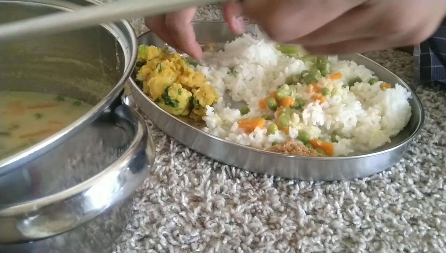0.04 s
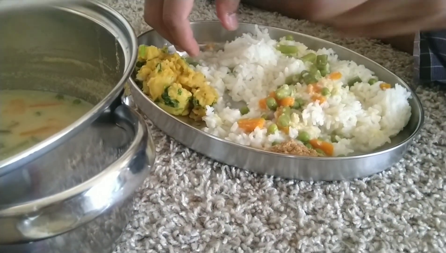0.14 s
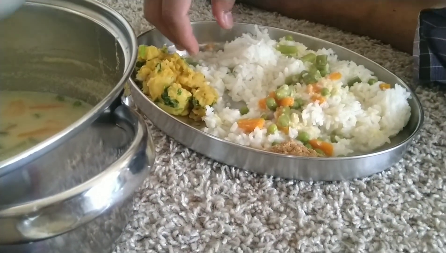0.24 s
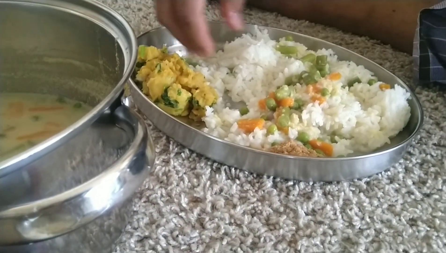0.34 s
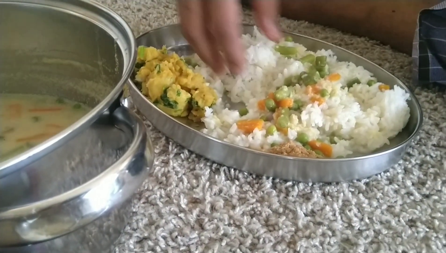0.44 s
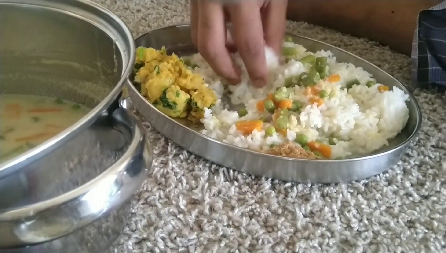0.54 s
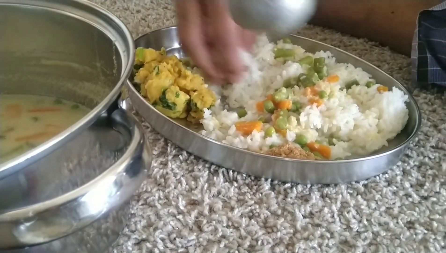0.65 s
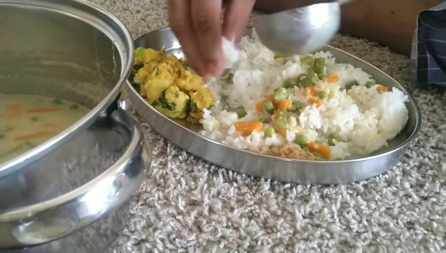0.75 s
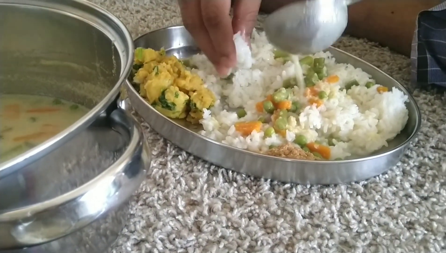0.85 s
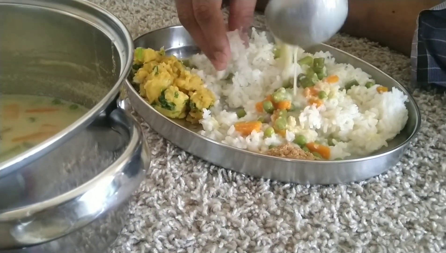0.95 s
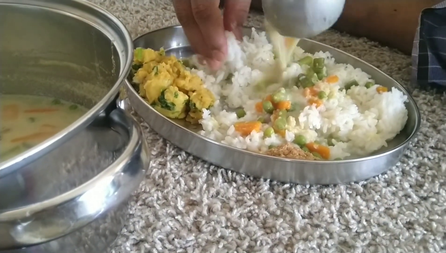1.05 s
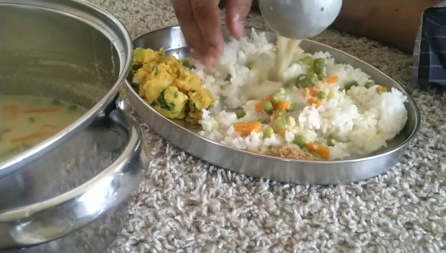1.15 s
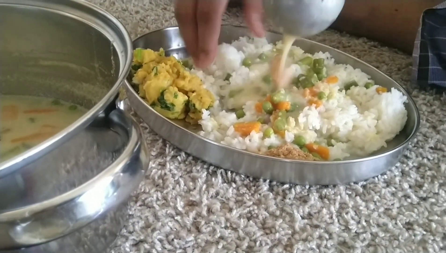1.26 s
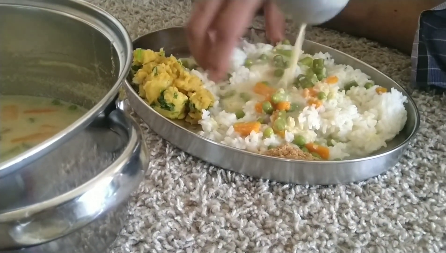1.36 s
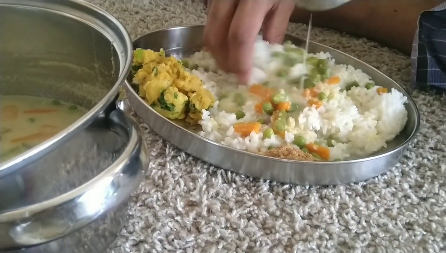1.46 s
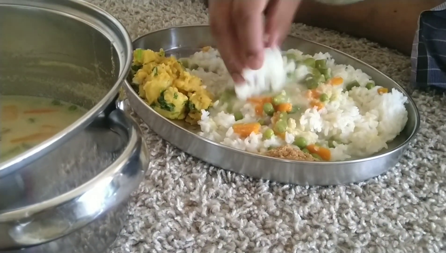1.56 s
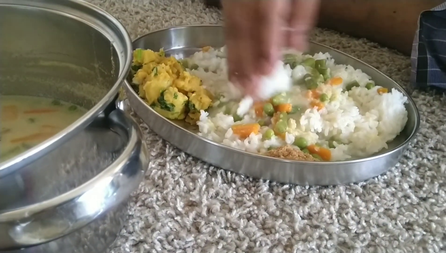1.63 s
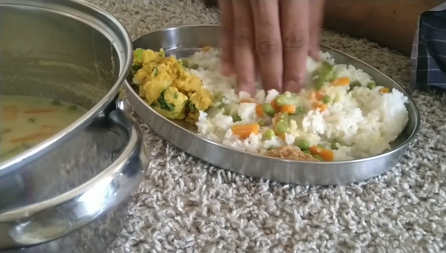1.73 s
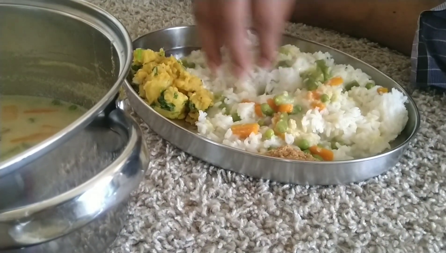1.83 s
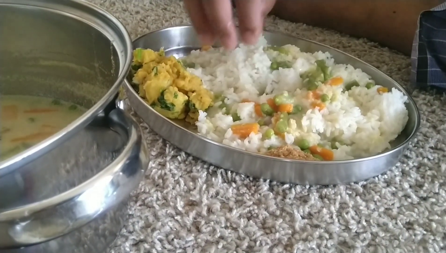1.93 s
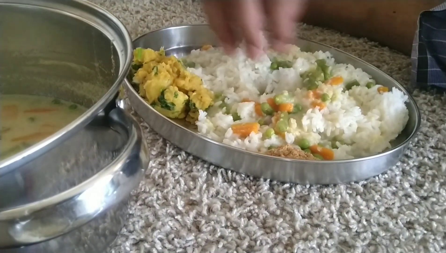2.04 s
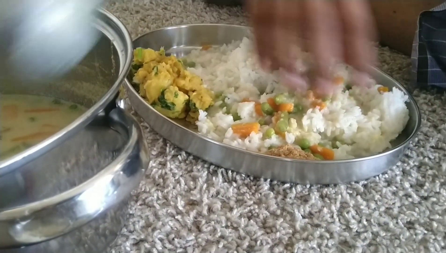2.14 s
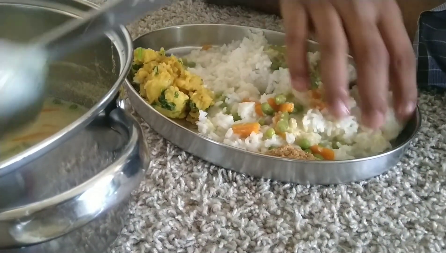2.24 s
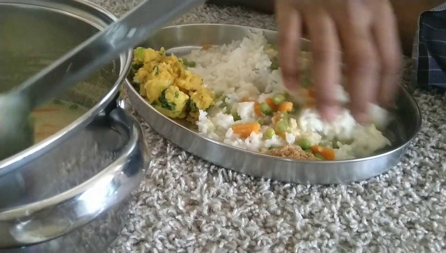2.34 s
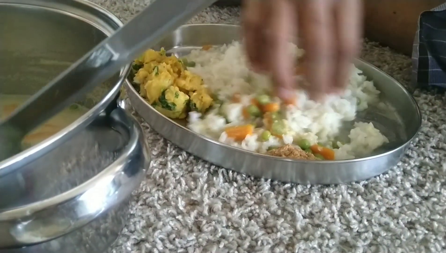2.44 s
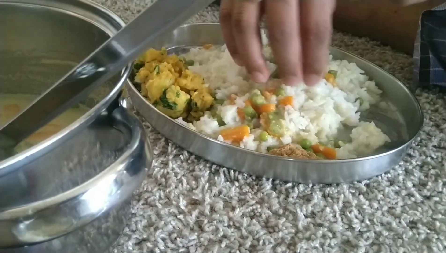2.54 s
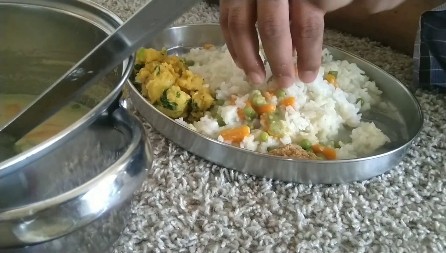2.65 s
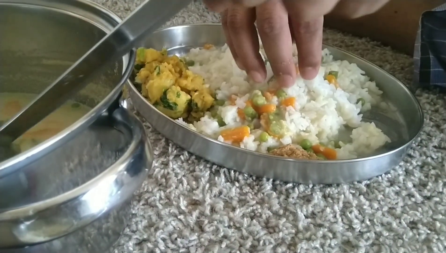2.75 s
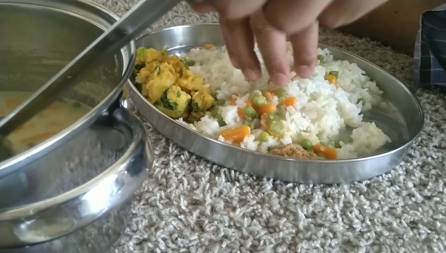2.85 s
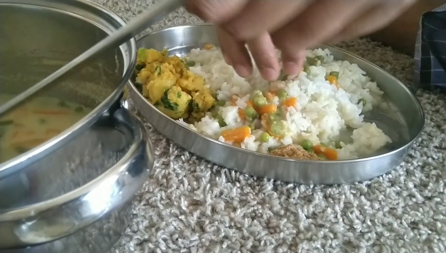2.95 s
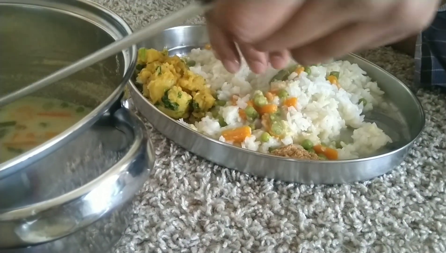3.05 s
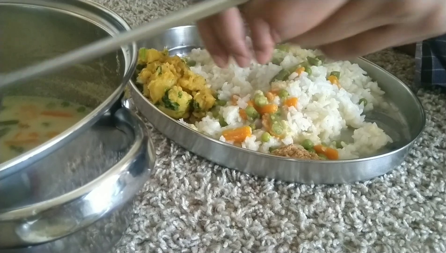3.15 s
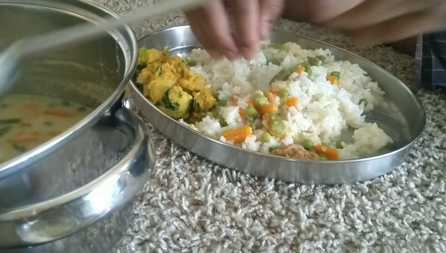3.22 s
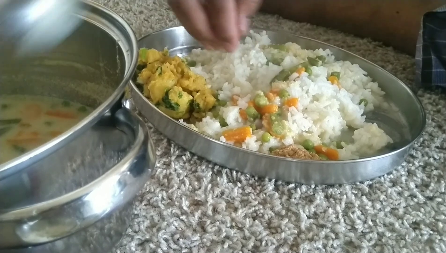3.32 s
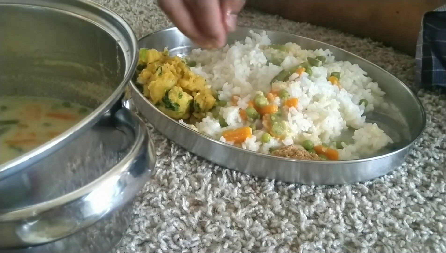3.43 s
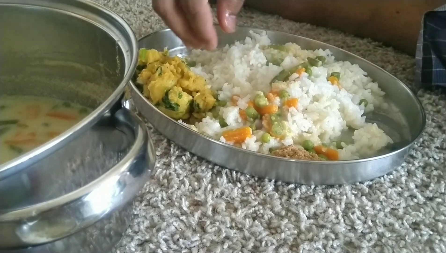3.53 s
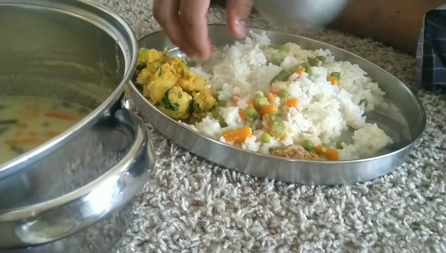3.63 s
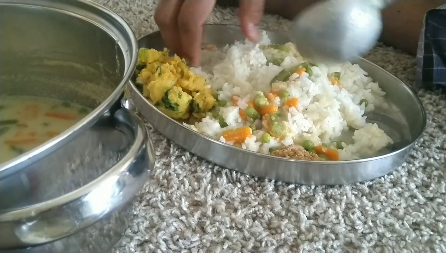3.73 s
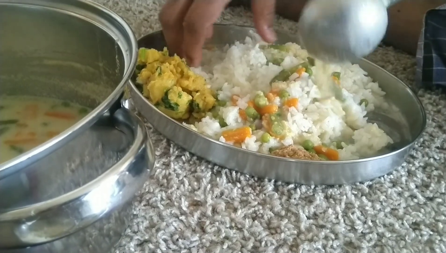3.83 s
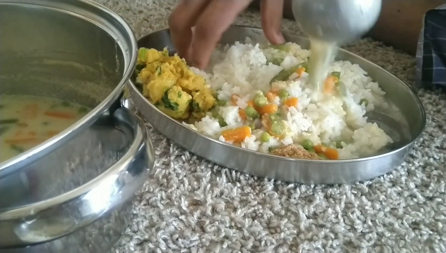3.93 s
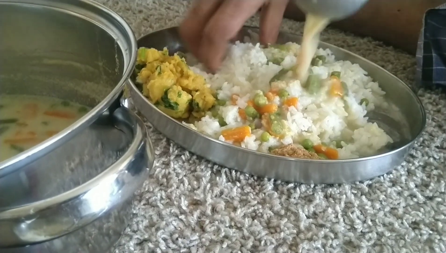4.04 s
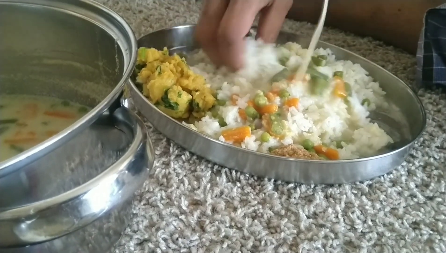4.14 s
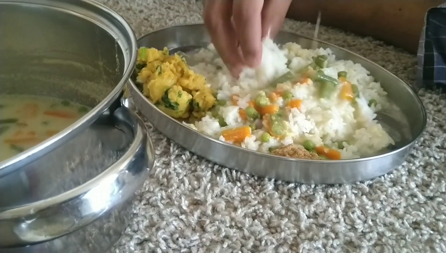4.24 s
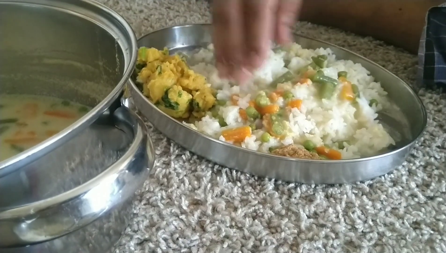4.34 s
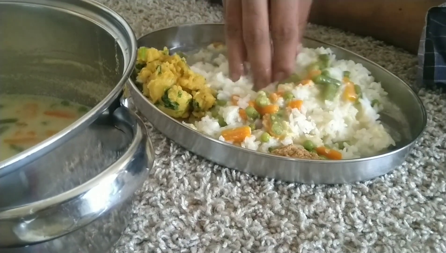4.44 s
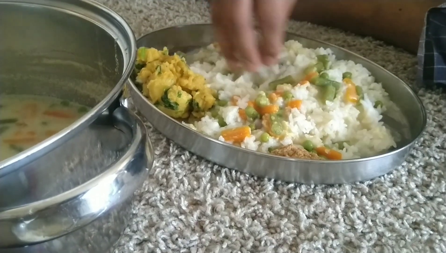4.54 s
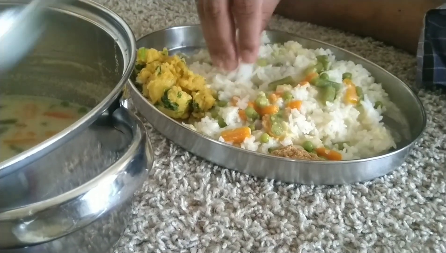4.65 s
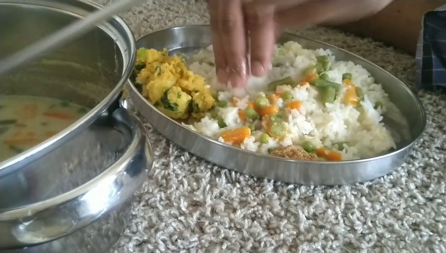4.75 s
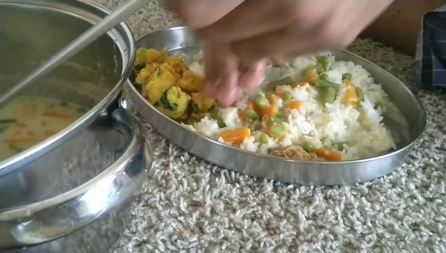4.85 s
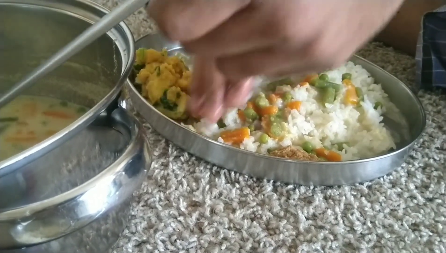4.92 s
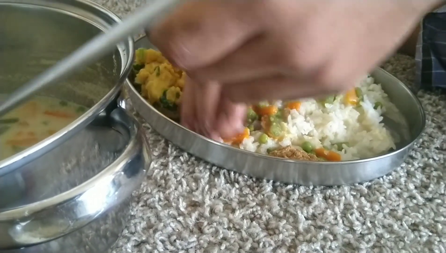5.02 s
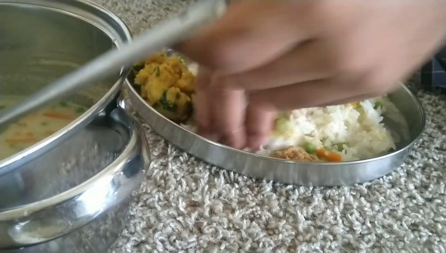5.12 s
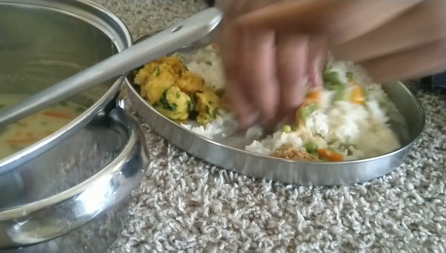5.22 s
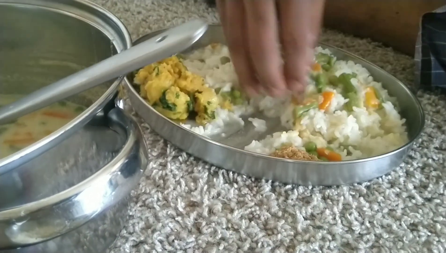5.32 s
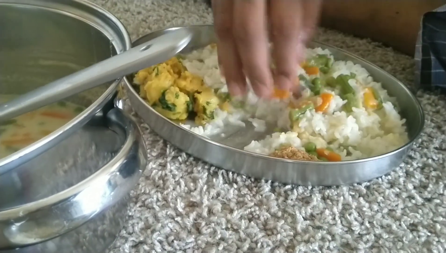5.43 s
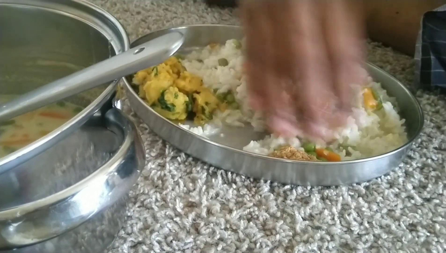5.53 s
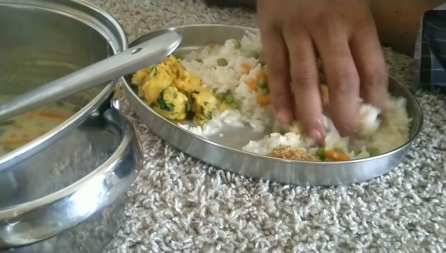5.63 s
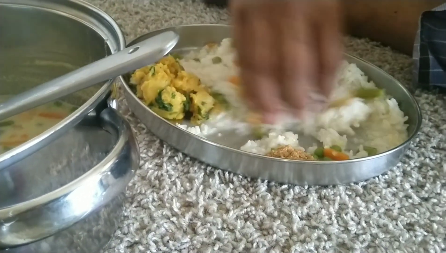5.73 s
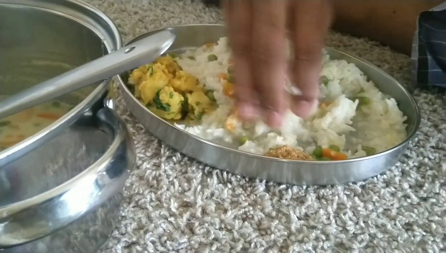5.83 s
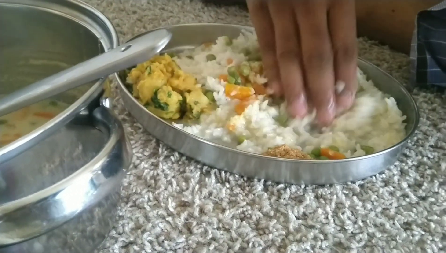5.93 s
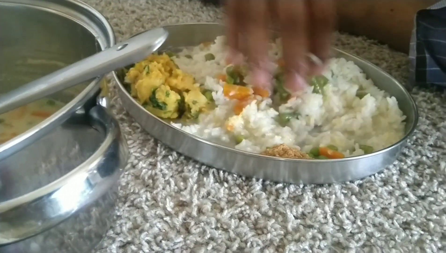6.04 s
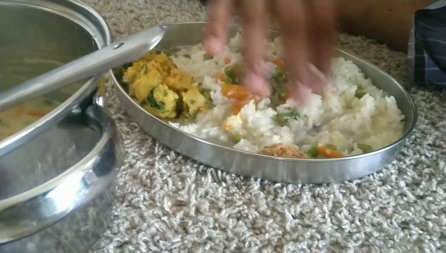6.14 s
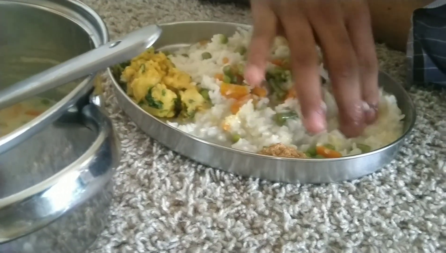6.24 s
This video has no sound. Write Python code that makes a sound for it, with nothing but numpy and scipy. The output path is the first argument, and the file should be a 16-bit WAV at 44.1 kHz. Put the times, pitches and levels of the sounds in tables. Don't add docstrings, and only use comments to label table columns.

```python
import sys
import numpy as np
from scipy import signal
from scipy.fft import rfft, irfft, next_fast_len
from scipy.io import wavfile
from scipy.ndimage import uniform_filter1d

SR = 44100
rng = np.random.default_rng(int(sys.argv[2]) if len(sys.argv) > 2 else 0)


def decibels_to_gain(level_db):
    exponent = np.asarray(level_db, float) / 20
    return 10 ** exponent


def master_out(mix):
    frames = np.transpose(np.atleast_2d(mix))
    ceiling = np.clip(frames, -1, 1)
    pcm = np.round(ceiling * 32767).astype(np.int16)
    wavfile.write(sys.argv[1], SR, pcm)


N = 276948


def evened(x):
    return x / np.sqrt(np.mean(x ** 2) + 1e-20)


def read(points, hz):
    f, value = np.transpose(points)
    return np.interp(np.log(hz + 1), np.log(f + 1), value)


def add(mix, start_s, sound):
    part = mix[round(start_s * SR):][:len(sound)]
    part += sound[:len(part)]


def colour(x, points):
    size = 4096
    db = np.maximum(read(points, abs(np.fft.fftfreq(size, 1 / SR))), -90)
    log_gain = np.log(decibels_to_gain(db))
    taps = np.fft.ifft(np.exp(log_gain - 1j * signal.hilbert(log_gain).imag)).real[:size // 2]
    return signal.oaconvolve(x, taps)[:len(x)]


def resonate(x, hz, width_hz):
    pole = np.exp((2j * hz - max(width_hz, 1)) * np.pi / SR)
    return 2 * signal.lfilter([1 - abs(pole)], [1, -pole], x).real


def contact_forces(t, s, peak_db, chatter_s, flat_db):
    rebound_rise_s, first_rise_s = 0.0025, 0.0002
    first_chatter = 0.65
    duller_db_per_db = 0.1055
    rebound = s > s[0]
    since = np.maximum(t - s, 0)
    ticks = rng.standard_normal(since.shape) * (0.5 + 0.5 * rng.exponential(1, since.shape))
    rise = 1 - np.exp(-since / (rebound_rise_s * rebound + first_rise_s))
    decay = np.exp(-since / (chatter_s * np.where(rebound, 1, first_chatter)))
    force = decibels_to_gain(peak_db) * ticks * rise * decay
    treble = signal.sosfilt(signal.butter(2, 1600, "high", fs=SR, output="sos"), force)
    bass_db = flat_db + duller_db_per_db * (peak_db[0] - peak_db)
    return treble + decibels_to_gain(bass_db) * (force - treble)


def small_modes(force, t60_s):
    t = np.arange(SR // 4) / SR
    thicket = rng.standard_normal((len(force), len(t))) * decibels_to_gain(-60 * t / t60_s)
    thicket /= np.linalg.norm(thicket[0])
    tail = signal.fftconvolve(force, thicket, axes=1).sum(0)[:force.shape[1]]
    return force.sum(0) + 1.54 * tail


def ladle(contacts, modes, body, modes_db, body_db, ring, spread_db, flat_db, chatter_s, thicket_t60_s):
    neighbour_db, narrowest_hz = -7, 11
    s, peak_db = np.array(contacts).T[..., None]
    t = s[0] + np.arange(round((s[-1, 0] - s[0, 0]) * SR) + SR // 2) / SR
    force = contact_forces(t, s, peak_db, chatter_s, flat_db)
    out = decibels_to_gain(body_db) * colour(small_modes(force, thicket_t60_s), body)
    luck = decibels_to_gain(spread_db * rng.standard_normal((len(s), len(modes), 3)))
    luck /= np.sqrt(np.average(luck ** 2, axis=0, weights=decibels_to_gain(2 * peak_db[:, 0])))
    for k, (hz, width_hz, db) in enumerate(modes):
        damped_hz = max(width_hz * ring, narrowest_hz)
        for side in range(3):
            offset = side - 1
            drive = luck[:, k, side] @ force
            gain = decibels_to_gain(db + modes_db + neighbour_db * abs(offset))
            out += gain * resonate(drive, hz + offset * width_hz * 0.48, damped_hz)
    return s[0, 0], out


def ladle_dip():
    # [t/s, peak level/dB]
    contacts = [(2.6255, -16.5), (2.6407, -25), (2.645, -29.5), (2.6669, -21.5), (2.6802, -29.5),
                (2.6914, -29), (2.6987, -35), (2.7123, -33), (2.735, -42.5), (2.7536, -31), (2.7656, -30.5),
                (2.7804, -35.5), (2.7897, -44), (2.815, -47), (2.856, -38), (2.871, -39)]
    # [f/Hz, width/Hz, level/dB]
    modes = [(810, 17, -3), (940, 43, -2), (1170, 150, -3.5), (1760, 200, -14.5), (2620, 86, -1.5),
             (2880, 50, 0), (3020, 81, -6), (3400, 24, -12), (3630, 160, -16.5), (4000, 20, -8.5),
             (4250, 89, 1), (4560, 34, -1.5), (5100, 72, -3.5), (5360, 61, -5.5), (5570, 61, -9),
             (5570, 51, 1.5), (5910, 100, -0.5), (6300, 36, -9), (7500, 45, -10.5), (7450, 74, -16),
             (2450, 3.3, -0.5), (3310, 10, 2)]
    # [f/Hz, density/dB per Hz]
    body = [(210, -37), (350, -4), (406, -3.5), (523, -8), (859, -8), (918, -8), (1250, -7), (2080, -24),
            (2440, -33), (3950, -25), (5380, -11), (7830, -39.5), (8600, -34), (11200, -73), (18900, -120)]
    return ladle(contacts, modes, body, modes_db=1.5, body_db=4, ring=0.77, spread_db=4.5,
                 flat_db=-3.5, chatter_s=0.011, thicket_t60_s=0.14)


def ladle_drop():
    # [t/s, peak level/dB]
    contacts = [(5.2772, -6.5), (5.2833, -15.5), (5.301, -9), (5.3131, -11), (5.3214, -13), (5.3457, -8.5),
                (5.358, -14.5), (5.3797, -17.5), (5.4003, -21.5), (5.4221, -15), (5.4364, -17),
                (5.451, -20), (5.4651, -19.5), (5.492, -19), (5.513, -26), (5.5298, -23), (5.54, -43.5),
                (5.559, -26.5), (5.5762, -38.5), (5.595, -32.5), (5.6078, -41)]
    # [f/Hz, width/Hz, level/dB]
    modes = [(438, 13, -12.5), (544, 27, -12.5), (774, 10, -12), (939, 25, -8.5), (1320, 42, -19.5),
             (1810, 100, -11), (2455, 34, 0.5), (2890, 85, -7.5), (3200, 15, -7), (3520, 70, -19),
             (3780, 23, -22.5), (3910, 26, -20.5), (4100, 29, -6), (4200, 31, -6), (4480, 140, -17),
             (5034, 94, -2.5), (6000, 30, -13), (5730, 30, 0.5), (6030, 51, -6), (6580, 130, -24),
             (7000, 210, -27), (7590, 55, -8.5), (8180, 20, -25), (2500, 50, -10), (737, 18, -10.5),
             (1367, 95, -13.5)]
    # [f/Hz, density/dB per Hz]
    body = [(210, -75.5), (350, -21), (406, -10.5), (684, -10), (931, -10.5), (1550, -16), (1820, -12),
            (2050, -26), (2470, -7), (2680, -11), (5100, -3.5), (7730, -10), (8600, -38), (11200, -71.5),
            (18900, -120)]
    return ladle(contacts, modes, body, modes_db=8, body_db=-5, ring=0.47, spread_db=-0.5,
                 flat_db=-2, chatter_s=0.013, thicket_t60_s=0.11)


def smack(db, hz, cycles, glide, snap_db):
    t = np.arange(600) / SR
    u = t * hz / max(cycles, 1)
    envelope = np.minimum(u * 4, 1) * np.exp(-1.5 * u - 0.66 * u ** 2)
    ring = np.sin(2 * np.pi * hz * t * (1 + glide * (u - 0.6))) * envelope
    snap = decibels_to_gain(snap_db) * rng.standard_normal(len(t)) * np.exp(-t / 0.00045)
    return decibels_to_gain(db + 6.5) * (ring + snap - uniform_filter1d(snap, size=16))


def crackle():
    # [f/Hz, level/dB]
    grains = [(2300, -13), (3100, -6.5), (4000, -23), (4800, 0.5), (5600, 1.5), (6500, -4.5), (7600, -12)]
    pops_per_s, spread_db = 2000, 4
    size = decibels_to_gain(spread_db * np.minimum(rng.exponential(1, N), 4))
    size *= rng.random(N) < pops_per_s / SR
    pocket = rng.integers(0, len(grains), N)
    pops = np.zeros(N)
    for k, (hz, db) in enumerate(grains):
        grain = smack(db, hz, cycles=8.4, glide=0.22, snap_db=-4)
        pops += signal.oaconvolve(size * (pocket == k), grain)[:N]
    return evened(pops)


def rice():
    # [t/s, peak level/dB, f/Hz, ring/ms]
    smacks = [(0.592, -47.5, 6210, 1.8), (0.665, -51, 6130, 2.6), (0.733, -40, 6120, 1.1),
              (0.7525, -48, 5520, 1.4), (0.759, -40, 5250, 0.52), (1.1188, -54, 3200, 3),
              (1.167, -46, 4900, 1.5), (1.1733, -48, 5070, 2.2), (1.1923, -53, 5600, 2.23),
              (1.2202, -40.5, 3160, 2.4), (1.221, -37.5, 3940, 4.7), (1.226, -47, 5840, 1.2),
              (1.2511, -34.5, 5240, 0.76), (1.296, -43, 1160, 2.5), (1.2995, -58, 5600, 1.9),
              (1.3594, -52, 4750, .9), (1.39, -38.5, 5160, 1.1), (1.388, -42.5, 2870, 4.1),
              (1.4512, -53, 4900, 2.3), (1.4607, -48.5, 2090, 0.95), (1.484, -53, 1660, 1.6),
              (1.5028, -41.5, 4930, 2.4), (1.518, -51.5, 3150, 2.9), (1.519, -49, 7600, 1.4),
              (1.5285, -45, 4550, 0.71), (1.573, -49, 5730, 1.9), (1.5963, -43, 4250, 2.27),
              (1.6053, -38.5, 2620, 0.7), (1.6178, -46, 5400, 1.3), (1.6432, -43, 7430, 1.4),
              (1.7887, -54, 5200, 1.8), (1.9189, -46.5, 5100, 1.3), (2.4673, -39, 5600, 1.6),
              (2.472, -46.5, 3500, 0.7), (2.492, -42, 4700, 4.1), (2.506, -52, 6800, 1.4),
              (2.573, -54, 3420, 2.1), (3.8788, -50.5, 4400, 0.61), (3.9123, -53, 4810, 2.8),
              (3.949, -38.5, 5000, 1.4), (3.996, -45.5, 4500, 1.3), (4.0289, -46.5, 4900, 2.9),
              (4.0654, -44, 3040, 2.8), (4.1043, -44, 5500, 1.3), (4.1077, -45.5, 5160, 2.1),
              (4.169, -55, 5260, 2.1), (4.1876, -50, 7590, 1.3), (4.2046, -42.5, 5800, 1),
              (4.227, -34, 5480, 2.4), (4.237, -37, 5700, 1.3), (4.2507, -49, 2930, 3.7),
              (4.2639, -47, 5910, 1.3), (4.3382, -48.5, 6200, 1.7), (4.354, -45, 4200, 2.6),
              (4.3706, -50, 5560, 0.98), (4.522, -41.5, 5530, 2.4), (4.5822, -48.5, 5460, 3.2),
              (4.6136, -50.5, 5600, 1.4), (4.6695, -53, 4760, 2.5), (4.678, -51, 5460, 1.5),
              (4.5066, -51, 5800, 3.2), (4.692, -53, 4500, 1.1), (5.7017, -54, 5100, 2.1),
            (5.7292, -45.5, 5430, 2.6), (5.7517, -45, 5570, 2.6), (5.8025, -50, 7440, 2),
            (5.824, -44.5, 6300, 0.99), (5.9938, -50, 6700, 1), (6.015, -49, 4800, 2.2),
            (6.048, -51, 5380, 1.9), (6.0678, -40.5, 5000, 1.2)]
    # [t/s, length/s, crackle level/dB]
    strokes = [(0.628, 0.2, -65), (0.987, .1, -64), (1.063, 0.3, -65.5), (1.423, 0.3, -62),
               (1.654, 0.39, -67.5), (2.34, 0.31, -66.5), (3.872, 0.57, -65.5), (4.36, 0.2, -78),
               (4.467, 0.3, -68.5), (5.62, 0.3, -63), (5.945, 0.22, -67.5)]
    fizz_db, fizz_s = -28.5, 0.02
    press_s, lift_s = 0.095, 0.086
    out, level, t = np.zeros(N), np.zeros(N), np.arange(N) / SR
    for s, db, hz, ms in smacks:
        snap_db = -17 + 0.6 * (db + 43.5)
        add(out, s, smack(db, hz, hz * ms / 1000, 0.067, snap_db))
        add(level, s, decibels_to_gain(db + fizz_db) * np.exp(-t[:SR // 4] / fizz_s))
    for s, length_s, db in strokes:
        swell = np.minimum((t - s) / press_s, (s + length_s - t) / lift_s)
        level += decibels_to_gain(db) * np.clip(swell, 0, 1)
    return out + level * crackle()


def room(x, t60_s, wet_db):
    taps = np.zeros(SR // 2)
    at = np.arange(60, SR // 2 - 20, 20)
    at = at + rng.integers(0, 20, len(at))
    taps[at] = rng.choice([-1., 1.], len(at)) * decibels_to_gain(-60 * at / SR / t60_s)
    return x + decibels_to_gain(wet_db) * signal.oaconvolve(x, taps / np.linalg.norm(taps))[:N]


def steady(points, db):
    size = next_fast_len(N)
    gain = decibels_to_gain(read(points, np.fft.rfftfreq(size, 1 / SR)))
    noise = irfft(rfft(rng.standard_normal(size)) * gain, size)[:N]
    return decibels_to_gain(db) * evened(noise)


def fan():
    # [f/Hz, density/dB per Hz]
    rumble = [(14, -34), (29, -22), (39, -34), (60, -13.5), (83, -7.5), (112, 1.5), (128, -2.5),
              (165, -7.5), (182, -21), (205, -13.5), (290, -16.5), (340, -24.5), (420, -20.5), (500, -30.5),
              (600, -43.5), (800, -91.5)]
    # [f/Hz, density/dB per Hz]
    air = [(290, -30.5), (500, -3), (518, -6), (570, -4.5), (706, -9.5), (865, -7), (929, -1.5),
           (1030, -14), (1250, -10.5), (1740, -21.5), (2410, -23), (3320, -31), (5540, -25), (7630, -41.5),
           (8600, -60.5), (11200, -90), (18900, -120)]
    # [f/Hz, width/Hz, level/dB]
    tones = [(27.8, 2.9, -67), (120.3, 3.4, -44), (131.5, 24, -54.5), (296.5, 8.1, -60.5), (903.4, 20, -65),
             (1240, 240, -78)]
    out = steady(rumble, -35) + steady(air, -59.5)
    for hz, width, db in tones:
        bell = [(hz - 3 * width, -70), (hz - width / 2, -4), (hz, 0),
                (hz + width / 2, -4), (hz + 3 * width, -70)]
        out += steady(bell, db)
    return out


def scene():
    steel = np.zeros(N)
    add(steel, *ladle_dip())
    add(steel, *ladle_drop())
    mono = room(steel, t60_s=0.078, wet_db=-13) + room(rice(), t60_s=0.083, wet_db=-11) + fan()
    return np.tile(mono, (2, 1))


def widen(mono):
    # [f/Hz, signed gain]
    right_gain = [(300, 1), (390, .9), (470, .47), (545, 0), (630, -.4), (770, -.5), (960, -.33), (1080, 0),
                  (1180, .03), (1320, .24), (1460, 0), (1770, 0), (1830, -.045), (2330, -.03), (2450, .025),
                  (2760, 0)]
    size = next_fast_len(len(mono))
    right = read(right_gain, np.fft.rfftfreq(size, 1 / SR))
    left = 2 * rfft(mono, size) / (1 + right)
    return irfft(np.array([left, left * right]), size)[:, :len(mono)]


def top_cut(x):
    return signal.sosfilt(signal.butter(12, 8910, fs=SR, output="sos"), x)


def record(dry):
    pad = 2048
    longer = np.pad(dry[0], pad, "reflect", reflect_type="odd")
    low_pass = signal.firwin(201, 8080, window=("kaiser", 9), fs=SR)
    mono = signal.oaconvolve(longer, low_pass, "same")
    return top_cut(widen(mono)[:, pad:N + pad])


dry = scene()
out = record(dry)
master_out(out)
```